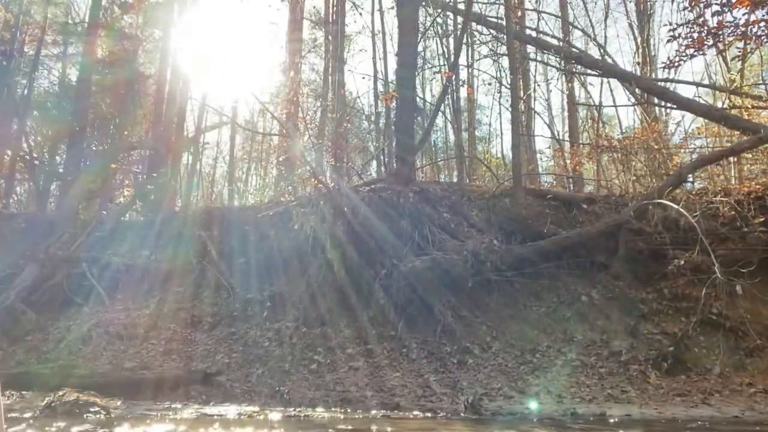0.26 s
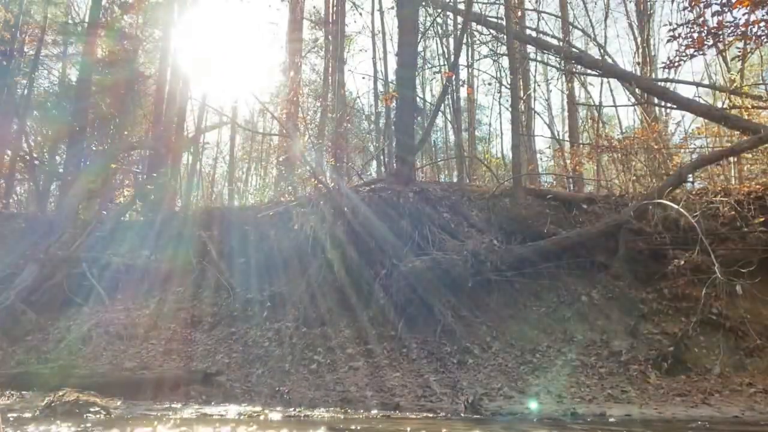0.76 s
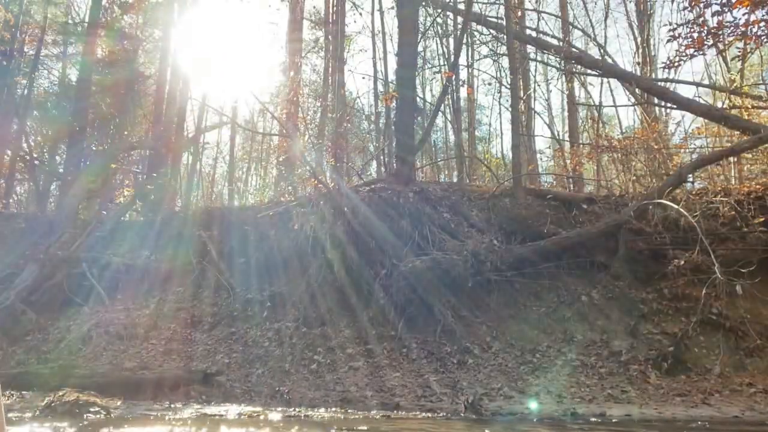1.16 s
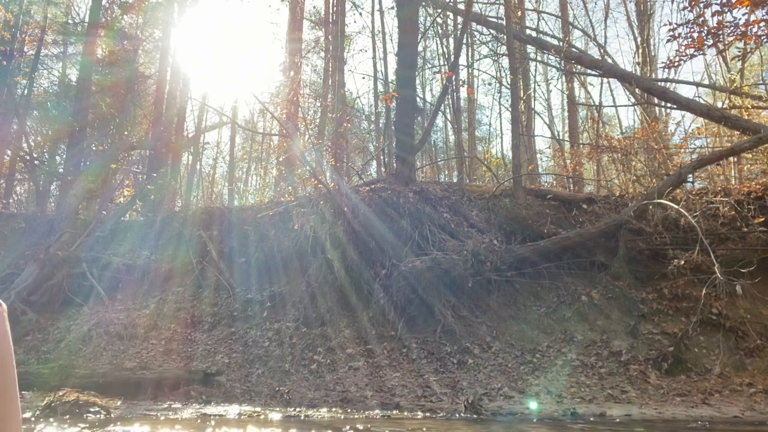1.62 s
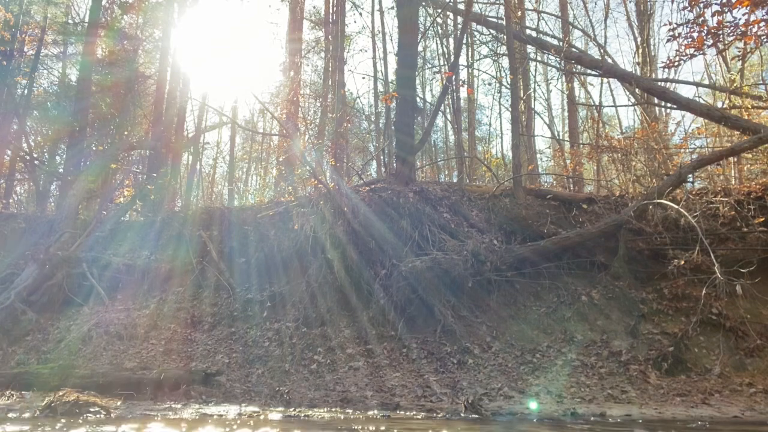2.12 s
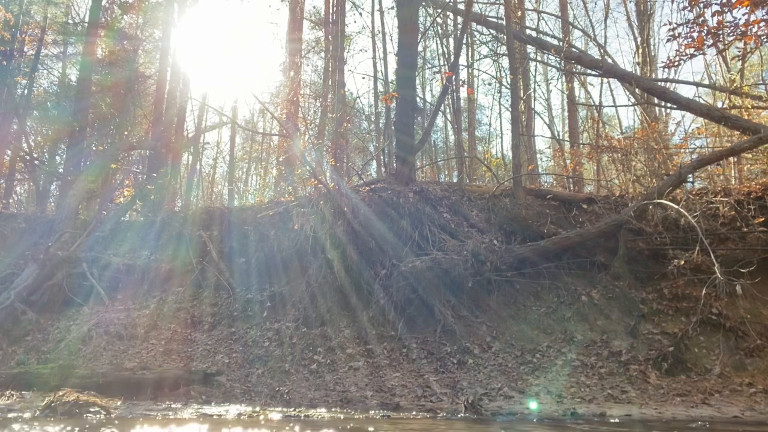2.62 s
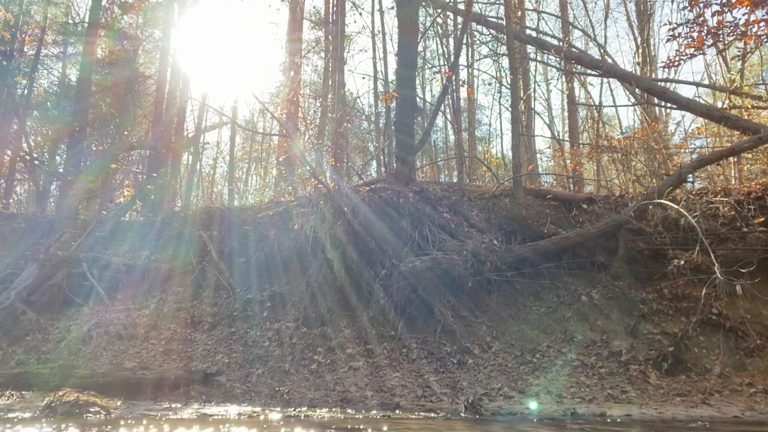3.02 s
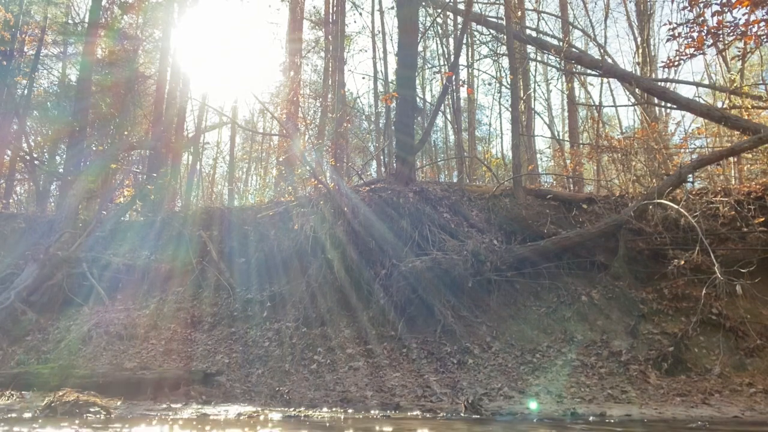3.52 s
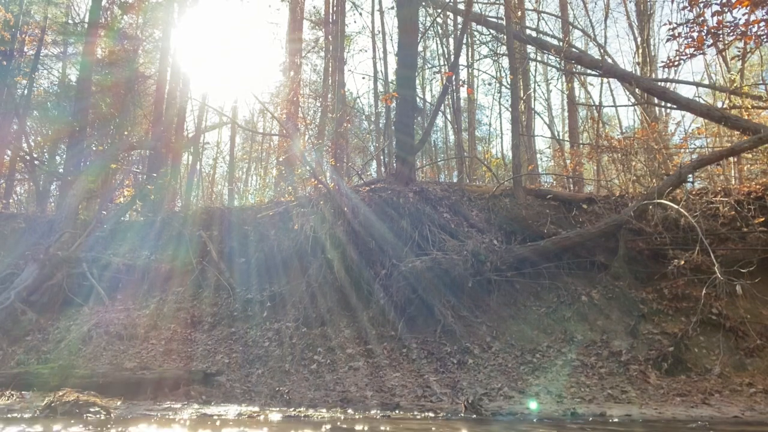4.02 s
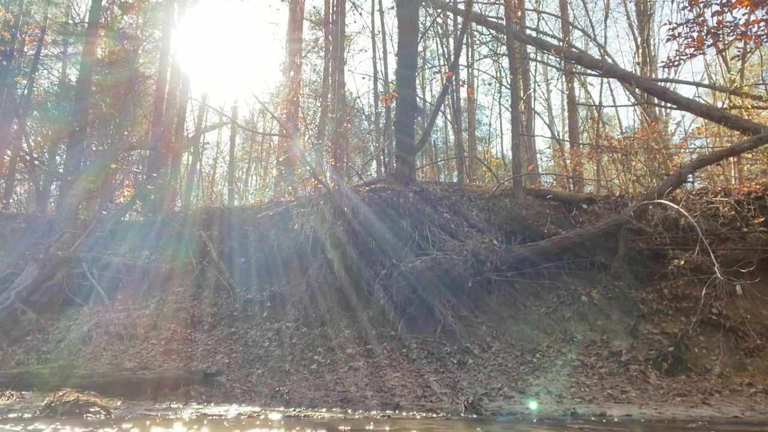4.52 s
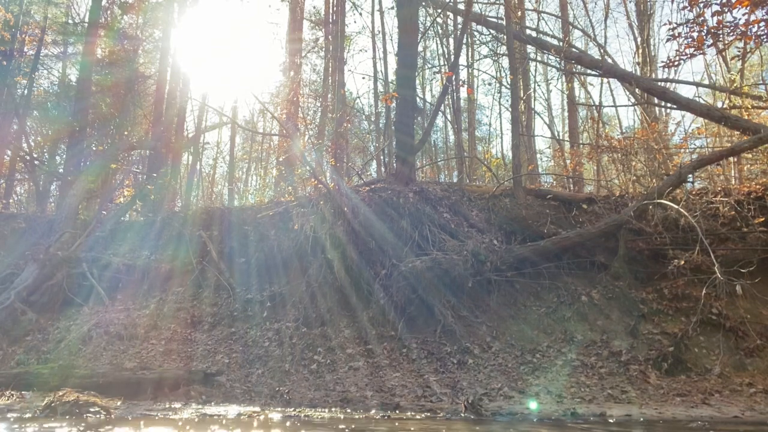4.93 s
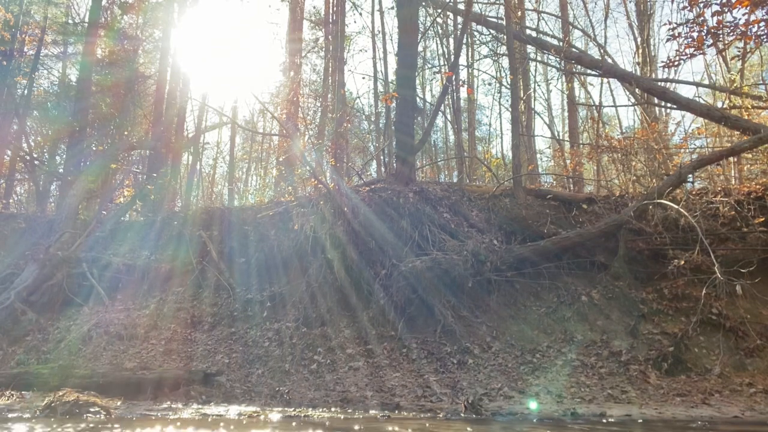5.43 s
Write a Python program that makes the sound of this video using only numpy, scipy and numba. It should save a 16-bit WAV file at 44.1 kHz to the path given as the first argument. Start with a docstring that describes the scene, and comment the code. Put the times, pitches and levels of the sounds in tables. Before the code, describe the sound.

A plastic bucket knocks and dips in a shallow creek, water plinking and sloshing, ending with two loud hollow thuds to the left.

```python
"""Plastic bucket in a shallow creek

A plastic bucket is dragged, knocked and dipped in a creek, left of a small two-microphone recorder.
Knocks crack, ring the wall modes and thud with a hollow pitch that sinks as the bucket fills.
Drops plink as single rising sines; slosh is clouds of such bubbles, with spray made of noisy grains.
Filtered noise makes the creek's trickle and a low rumble that surges after knocks and follows the slosh."""
import sys
import numpy as np
from scipy import signal
from scipy.fft import rfft, irfft, next_fast_len
from scipy.io import wavfile
from numba import njit

SR = 44100
rng = np.random.default_rng(int(sys.argv[2]) if len(sys.argv) > 2 else 0)


def master(y):
    """Save y as 16-bit WAV."""
    cut = np.clip(np.atleast_2d(y).T, -1, 1)
    pcm = np.round(cut * 32767)  # scale
    wavfile.write(sys.argv[1], SR, pcm.astype(np.int16))


N = 249606

# blows on the bucket: t/s, hollow peak level/dB, hollow tone f/Hz, wall ring level/dB re hollow,
# crack level/dB re hollow, strongest wall pitch f/Hz
BUCKET_KNOCKS = [(0.346, -28, 526, -5.5, -1, 870), (0.378, -33, 563, -19, -53, 595),
                 (0.402, -34.5, 560, -6.5, -23, 590), (0.567, -40.5, 450, -4, 1.5, 2330),
                 (0.612, -25.5, 433, -4.5, -5.5, 840), (0.632, -20.5, 410.7, -4, -9, 980),
                 (0.65, -29.5, 381, 3.5, -6, 1720), (0.69, -33.5, 456, -9, -25, 895),
                 (0.707, -32.5, 452, -2, -5, 1340), (0.721, -29.5, 448, 13.5, 5, 990),
                 (0.743, -29.5, 331, -3.5, -8, 840), (1.332, -34, 247, -6.5, -41, 614),
                 (1.683, -44.5, 540, -1.5, -22, 660), (2.506, -40, 488, -5, -6.5, 1000),
                 (2.905, -24, 318, -4, -9, 940), (2.986, -38, 297, -11, -15, 2580),
                 (3.047, -39.5, 328, -30, 16, 1990), (3.422, -37.5, 321, 6.5, -2, 2410),
                 (3.984, -31.5, 311, 3, -9.5, 1035), (4.166, -52.5, 315, 14, -19, 1240),
                 (4.284, -38, 331, 11, -4, 930), (4.294, -33, 271, -15, -22, 867),
                 (4.32, -28.5, 259, -16, -10.5, 860), (4.409, -29.5, 250, -12, -22, 2300),
                 (4.425, -14, 256.7, 7, -8.5, 1250), (4.477, -32.5, 220, -18, -14, 2110),
                 (4.882, -11.5, 214, 7, -6.5, 1790), (4.945, -25.5, 224, -11.5, -20, 780),
                 (4.971, -35, 212, -7, -17, 780), (4.996, -29.5, 267, -5, -22, 900),
                 (5.242, -30, 237, 13.5, -11, 1490), (5.25, -2.5, 244.5, -4.5, -36, 760),
                 (5.263, -22, 243, 3.5, -3, 1780), (5.309, -25.5, 218.5, -7, -14, 623),
                 (5.356, -33.5, 244, -15, -24, 798), (5.428, -34.5, 216, 0, -26, 980),
                 (5.605, 1, 243.3, -1.5, -14.5, 1020)]
# colour of the hard contact noise, also used for drop slaps: f/Hz, level/dB per Hz
CRACK_COLOUR = [(410, -20), (700, -19.5), (881, -6), (1270, -21.5), (1900, -5.5), (2260, -6.5), (2580, -10),
                (3010, -9), (5030, -19.5), (6620, -17.5), (8150, -18), (9610, -37.5), (12500, -107.5),
                (21100, -120)]
LEAD_IN_DB, LEAD_IN_GROWTH_S = -17.5, 0.0042   # level re wall ring, growth time


def bucket():
    """A knock is uneven contact with a short rattle: it cracks, rings the wall at once, the hollow a little later."""
    out = np.zeros(N)
    t = np.arange(SR // 6) / SR
    white = rng.standard_normal(N)
    crackle = colour(white, CRACK_COLOUR)
    grit = signal.sosfilt(signal.butter(2, 450, "high", fs=SR, output="sos"), white)
    for s, db, hollow_hz, wall_db, crack_db, spot_hz in BUCKET_KNOCKS:
        contact = burst(grit, 0.0018, 0.0093, 0.033)
        hollow = hollow_thud(hollow_hz, white, t)
        wall = wall_ring(contact, hollow_hz, spot_hz)
        crack = burst(crackle, 0.0018, 0.028, 0.25)
        add(out, s - .0025, amp(db) * (peak_one(hollow) + amp(crack_db) * crack))
        # faint noise swells before each knock
        growth = np.exp(-t[SR // 50:0:-1] / LEAD_IN_GROWTH_S)
        lead_in = burst(crackle, 0.78, 1, 0)[-SR // 50:] * growth
        add(out, s - 1 / 50, amp(db + wall_db + LEAD_IN_DB) * lead_in)
        add(out, s - .0062, amp(db + wall_db) * peak_one(wall))
    return out


HOLLOW_T60_S = 0.069


def hollow_thud(hz, white, t):
    """The stretched wall starts sharp and sags to rest, roughened by a fast loudness wobble at 0.28 of its pitch."""
    sag = .001 * (1 - np.exp(-t / .005))
    onset = 1 - np.exp(-(t * hz / 2.0) ** 2)
    hollow = np.sin(2 * np.pi * hz * (t + sag)) * onset * amp(-60 * t / HOLLOW_T60_S)
    rough_wobble = np.sin(2 * np.pi * (0.28 * hz * t + 0.55 + 0.32 * rng.random()))
    hollow = hollow * (1 + 0.4 * rough_wobble)
    # the shove moves water too
    water_shove = peak_one(ring(burst(white, 0.004, 0.03, 0.05), 110, 0.03))
    return hollow + 0.13 * (hz / 430) ** 2 * water_shove


# wall modes before the blow's place and the water act on them: f/Hz, level/dB, t60/s
WALL_MODES = [(336.6, 12.5, 0.1), (498.5, 6.5, 0.071), (582, 1, 0.045), (604.4, 2, 0.098),
              (847.2, 7, 0.049), (931, 3, 0.042), (1259, 6, 0.044), (1359.4, 4, 0.077), (1703, -2, 0.066),
              (2155, 6, 0.04), (2246, 1.5, 0.059), (2544, -0.5, 0.077), (2868, -1, 0.05),
              (3558, -0.5, 0.019)]
BEND_LAG_S = 0.0044   # bending waves are slower at low pitch: lag of a 1 kHz mode


def wall_ring(contact, hollow_hz, spot_hz):
    """The contact rings the wall modes; where the blow lands picks the modes."""
    free = (hollow_hz / 430) ** 1.67   # water that lowers the hollow tone also damps the wall
    wall = 0
    for mode_hz, mode_db, mode_t60 in WALL_MODES:
        off_spot = np.log2(mode_hz / spot_hz)   # octaves
        struck_db = mode_db - 5.0 * off_spot ** 2 + 1.5 * rng.standard_normal()
        lag = round(BEND_LAG_S * np.sqrt(1000 / mode_hz) * SR)
        late = np.pad(contact, (lag, 0))[:len(contact)]
        wall = wall + amp(struck_db) * peak_one(ring(late, mode_hz, free * mode_t60))
    return wall


# single drops and bubbles: t/s, peak level/dB, starting pitch f/Hz, slap level/dB re peak
SINGLE_DROPS = [(0.027, -47, 8300, -3.5), (0.064, -46.5, 8000, -10), (0.97, -44, 3020, -11),
                (1.183, -33.5, 915, -47), (1.243, -20, 2040, -15), (1.269, -40, 930, -38),
                (1.293, -35, 1300, -6), (1.309, -37.5, 1890, -14), (1.349, -25, 7780, -14),
                (1.368, -40.5, 2030, -6), (1.37, -45, 964, -17), (1.399, -39.5, 670, -5),
                (1.453, -39.5, 2450, -8), (1.769, -38.5, 1580, -14), (1.797, -25.5, 529, -10.5),
                (1.819, -37.5, 447, -11), (1.835, -30, 610, -17), (1.849, -35.5, 712, -10),
                (1.875, -35, 920, -12), (1.91, -23, 1676, -39), (1.91, -23.5, 648, -8.5),
                (1.909, -28, 1224, -13), (1.912, -26, 2165, -17), (1.93, -34, 581, -18),
                (1.961, -36, 1390, -19), (1.975, -27.5, 976, -31), (1.999, -36.5, 980, 3),
                (1.995, -28, 1640, -19), (2.007, -28, 3060, -16), (2.022, -34.5, 523, -2.5),
                (2.021, -32, 1590, -26), (2.046, -36, 2200, -7), (2.053, -36, 927, -11),
                (2.103, -41.5, 2240, -1), (2.121, -38.5, 2170, -8), (2.226, -45, 7950, 7),
                (2.242, -33, 2660, -6), (2.387, -43.5, 1260, -9), (2.557, -45, 528, -17),
                (2.752, -47, 960, -23), (2.602, -39, 920, 0), (2.588, -35, 2540, -1.5),
                (2.607, -28.5, 3760, 3), (2.617, -14, 8000, -8), (2.629, -28.5, 3846, -19.5),
                (2.66, -41, 518, -7), (2.734, -47.5, 475, 7), (3.048, -25.5, 3550, -55),
                (3.05, -14.5, 6620, -12), (3.163, -42.5, 1320, -4), (3.17, -41, 664, -12),
                (3.187, -33.5, 853, -25), (3.223, -42.5, 887, -35), (3.288, -33.5, 2030, -11.5),
                (3.302, -43, 3020, -52), (3.385, -35.5, 2560, -2.5), (3.469, -37.5, 1130, -2),
                (3.515, -40, 2310, -11), (3.564, -41.5, 2060, -13), (4.219, -38.5, 2420, -5.5),
                (4.273, -39.5, 860, -13), (4.735, -45, 878, -38.5), (5.142, -43.5, 2700, -47)]
DROP_RISE_S = 0.00018   # added to a rise of 1.38 cycles
DROP_CYCLES, CLEAN_CYCLES_PER_DB = 12.5, 2.1   # cycles to die away; the fainter its slap, the longer it rings


def drops():
    """Each drop slaps the surface, then its bubble rings and rises in pitch as it nears the air."""
    out = np.zeros(N)
    t = np.arange(SR // 6) / SR
    crackle = colour(rng.standard_normal(N), CRACK_COLOUR)
    for s, db, hz, slap_db in SINGLE_DROPS:
        life = (DROP_CYCLES - CLEAN_CYCLES_PER_DB * min(slap_db, 0)) / hz
        onset = 1 - np.exp(-(t / (1.38 / hz + DROP_RISE_S)) ** 2)
        bubble = np.sin(2 * np.pi * hz * t * (1 + 0.06 * t / life)) * onset * amp(-60 * t / life)
        add(out, s, amp(db) * peak_one(bubble))
        add(out, s - .002, amp(db + slap_db) * burst(crackle, 0.0015, 0.026, 0.53))
    return out


# slosh over time: t/s, big bubbles level/dB, small bubbles level/dB, spray level/dB
SLOSH_LEVELS = [(0.0, -97, -67, -76), (0.3, -76.5, -76.5, -75), (0.52, -55.5, -73, -66.5),
                (0.75, -60, -72, -78), (1.05, -58, -62.5, -78), (1.4, -49.5, -53.5, -65),
                (1.6, -115, -63.5, -73.5), (1.78, -68, -56, -77), (1.84, -65, -43, -54.5),
                (1.92, -46.5, -41, -56), (1.965, -53.5, -37.5, -60), (1.99, -39, -30.5, -49.5),
                (2.017, -50, -39.5, -63), (2.04, -46.5, -38, -58.5), (2.08, -56.5, -47.5, -59.5),
                (2.2, -51.5, -57.5, -69.5), (2.35, -74, -60, -70.5), (2.49, -60, -58, -66.5),
                (2.75, -59, -60, -73), (2.85, -67, -60.5, -66), (2.95, -70, -74.5, -74.5),
                (3.1, -48.5, -57, -74.5), (3.48, -70, -59, -64), (3.75, -71.5, -70, -80),
                (4.4, -62.5, -64.5, -78), (4.8, -57, -65, -81), (5.66, -49, -66, -75.5)]
# colour of the spray: f/Hz, level/dB per Hz
SPRAY_COLOUR = [(1470, -28.5), (2500, -24), (3430, 4.5), (4420, -28), (5060, -20.5), (5760, -4.5),
                (7600, -12.5), (8100, -8), (8500, -10), (8900, -17), (9610, -56), (12500, -80),
                (21100, -120)]


def slosh():
    """Stirred water releases bubble clouds of two sizes and a fine spray of random grains."""
    big_db, small_db, spray_db = in_time(SLOSH_LEVELS)
    big = amp(big_db) * cloud(193, 1167, 700, 4.6, 3.0, 2.9, 1.86)
    small = amp(small_db) * cloud(800, 4210, 2400, 13.0, 4.5, 4.3, -1.5)
    landed = rng.random(N) < 2500 * amp(4.0 * drift(30)) / SR
    grains = landed * rng.standard_normal(N)
    mist = 0.15 * rng.standard_normal(N)
    spray = amp(spray_db) * colour(rms_one(grains) + mist, SPRAY_COLOUR)
    return big + small + spray


def cloud(low_hz, high_hz, per_s, cycles, spread_db, clump_db, tilt_db):
    """Random bubbles in clumps, pitches spread over the octaves, level tilted in dB per octave upward; rms 1."""
    born = rng.random(N) < per_s * amp(clump_db * drift(15)) / SR
    octaves = np.log2(high_hz / low_hz) * rng.random(N)[born]
    loudness_db = spread_db * np.minimum(rng.exponential(1, N), 4)[born]
    sizes = amp(loudness_db + tilt_db * octaves)
    lives = cycles * amp(rng.normal(0, 5.6, N)[born] + 0.19 * octaves)
    steps = 2 * np.pi * low_hz * 2 ** octaves / SR   # radians a sample
    out = np.zeros(N)
    add_bubbles(out, np.flatnonzero(born), sizes, steps, lives, 0.25)
    return rms_one(out)


@njit
def add_bubbles(out, at, size, step, cycles, rise):
    """Each bubble is a dying sine whose pitch climbs as it nears the surface."""
    for k in range(len(at)):
        life = cycles[k] * 2 * np.pi / step[k]
        for i in range(min(int(life), len(out) - at[k])):
            tone = np.sin(step[k] * i * (1 + rise * i / life))
            out[at[k] + i] += size[k] * tone * np.exp(-6.9 * i / life) * min(1, step[k] * i / 9)


# colour of the trickle: f/Hz, level/dB per Hz
TRICKLE_COLOUR = [(88, -65.5), (150, -23), (299, -2.5), (336, -4.5), (451, -3.5), (632, 6), (1060, 0),
                  (1480, -7.5), (1870, 2), (2300, 0.5), (5000, -32.5), (6500, -69), (11000, -120)]
# trickle over time, before its random wavering: t/s, level/dB
TRICKLE_LEVEL = [(0, -71.5), (.3, -71.5), (.4, -58), (3.0, -59.5), (4.5, -58), (5.66, -57.5)]


def trickle():
    """The creek is smooth coloured noise; each of three ranges of pitch wavers on its own."""
    flow = colour(rng.standard_normal(N), TRICKLE_COLOUR)
    low, mid = (signal.sosfiltfilt(signal.butter(2, hz, fs=SR, output="sos"), flow) for hz in (800, 1700))
    wavering = 0
    for band in (low, mid - low, flow - mid):
        wavering = wavering + band * amp(0.5 * drift(5.3) + 4.35 * drift(19))
    return amp(in_time(TRICKLE_LEVEL)[0]) * wavering


# colour of the rumble: f/Hz, level/dB per Hz
RUMBLE_COLOUR = [(15, -52.5), (35, -22.5), (70, -14.5), (150, -17), (260, -25.5), (600, -95.5)]


def rumble():
    """Low coloured noise whose level surges with knocks and slosh and wanders slowly."""
    small_db = in_time(SLOSH_LEVELS)[1]
    level_db = surge(small_db) + 7.9 * drift(1.5)
    return amp(level_db) * colour(rng.standard_normal(N), RUMBLE_COLOUR)


RUMBLE_DB, RUMBLE_FOLLOWS = -32, 0.74   # surge scale for a 0 dB knock, share of the knock's dB
RUMBLE_RISE_S, RUMBLE_T60_S = 0.0084, 0.7
RUMBLE_REST_DB, RUMBLE_SLOSH_SHARE = -64, 0.81   # level at -60 dB small bubbles, share of their swing


def surge(small_db):
    """Rumble level in dB: powers add as it swells and dies after every knock and follows the small bubbles."""
    blows = np.zeros(N)
    for s, db, *_ in BUCKET_KNOCKS:
        blows[round(s * SR)] = amp(RUMBLE_DB + RUMBLE_FOLLOWS * db) ** 2
    t = np.arange(SR) / SR
    shape = (1 - np.exp(-t / RUMBLE_RISE_S)) * amp(-60 * t / RUMBLE_T60_S)
    knock_power = np.abs(signal.fftconvolve(blows, shape ** 2)[:N])
    slosh_power = amp(RUMBLE_REST_DB + RUMBLE_SLOSH_SHARE * (small_db + 60)) ** 2
    return 10 * np.log10(knock_power + slosh_power)


BANK_DB, BANK_T60_S, BANK_DULL_HZ = -23.5, 0.15, 1410   # level in the left channel, decay, upper band edge


def banks(x):
    """Short dull scatter from banks and trunks, unrelated in the two channels."""
    t = np.arange(SR // 4) / SR
    tail = rng.standard_normal((2, len(t))) * amp(-60 * t / BANK_T60_S) * (t > .004)
    tail = signal.sosfilt(signal.butter(2, [450, BANK_DULL_HZ], "band", fs=SR, output="sos"), tail)
    tail = tail / np.sqrt(np.sum(tail ** 2, axis=1, keepdims=True))
    return signal.fftconvolve(x[None], tail, axes=1)[:, :N]


# body shading of the right microphone above the bass: t/s, level/dB
BODY_SHADE = [(0, 3.5), (.3, -4), (.5, -4.5), (1.0, -8), (2.0, -11.5), (3.0, -10.5), (4.0, -10)]
# right channel against left before the bucket moves: f/Hz, phase/rad
PHASE_BEFORE = [(0, np.pi), (40, 2.5), (180, 2.3), (260, 2.0), (350, 1.2), (700, -3.1), (1200, -4.3),
                (1700, -9.0), (2200, -11.5), (2600, -14.0), (3500, -15.6), (4100, -19.0), (4400, -18.6),
                (5200, -15.7), (7600, -9.4), (12000, 1.0)]
# right channel against left once the bucket has moved: f/Hz, phase/rad, level/dB
PATH_AFTER = [(0, np.pi, -5), (60, 2.4, -5), (300, 2.0, -4), (680, 1.6, -16), (950, -1.1, -16),
              (1300, -1.5, -9), (2400, -4.7, -9), (3900, -6.8, -12), (5200, -3.1, -8), (7600, 3.2, -8),
              (9000, 6.5, -19)]
SHADE_HZ, BASS_SHADE_DB, RIGHT_DULL_HZ = 374, -2.5, 6700   # bass edge, bass level, top roll-off before the move
MOVED_S = 3.9   # the new path is fully in, after a 0.1 s crossfade


def right_channel(x):
    """The far microphone: phase turned by band, duller, body-shaded; the path changes when the bucket moves."""
    size = next_fast_len(N + SR // 10)
    grid = np.arange(size // 2 + 1) * SR / size
    spectrum = rfft(x, size)
    hz, turn = np.transpose(PHASE_BEFORE)
    dulling = np.sqrt(1 + (grid / RIGHT_DULL_HZ) ** 12)
    turned = irfft(spectrum * np.exp(1j * np.interp(grid, hz, turn)) / dulling, size)[:N]
    bass = signal.sosfiltfilt(signal.butter(2, SHADE_HZ, fs=SR, output="sos"), turned)
    before = amp(BASS_SHADE_DB) * bass + amp(in_time(BODY_SHADE)[0]) * (turned - bass)
    hz, turn, db = np.transpose(PATH_AFTER)
    path = np.exp(1j * np.interp(grid, hz, turn)) * amp(np.interp(grid, hz, db))
    after = irfft(spectrum * path, size)[:N]
    share = np.clip(10 * (np.arange(N) / SR - MOVED_S) + 1, 0, 1)
    return before + share * (after - before)


def amp(db):
    """Amplitude factor of a level in dB."""
    return 10 ** (np.asarray(db) / 20)


def rms_one(x):
    """Scales x to rms 1."""
    return x / np.sqrt(np.mean(x ** 2) + 1e-20)


def peak_one(x):
    """Scales x to peak 1."""
    return x / np.max(np.abs(x))


def in_time(rows):
    """Draws each column after t/s as a line over the whole scene."""
    s, *columns = np.transpose(rows)
    return [np.interp(np.arange(N) / SR, s, c) for c in columns]


def colour(x, spectrum):
    """Filters x by a curve of f/Hz, level/dB; rms 1."""
    hz, db = np.transpose(spectrum)
    size = next_fast_len(N)
    grid = np.log(np.arange(1, size // 2 + 2) * SR / size)
    return rms_one(irfft(rfft(x, size) * amp(np.interp(grid, np.log(hz), db)), size)[:N])


def drift(rate):
    """Slow random wander of spread 1, smoothed above a rate in Hz."""
    r = np.exp(-80 * np.pi * rate / SR)   # one step is 40 samples
    slow = signal.lfilter([1], [1, -2 * r, r * r], rng.standard_normal(N // 40 + 2002))[2000:]
    return np.interp(np.arange(N) / 40, np.arange(len(slow)), rms_one(slow))


def ring(clicks, hz, t60):
    """A resonator: a unit click sets a dying sine of height 1 ringing."""
    r, w = amp(-60 / (t60 * SR)), 2 * np.pi * hz / SR
    return signal.lfilter([0, np.sin(w)], [1, -2 * r * np.cos(w), r * r], clicks + 1e-18)


def burst(noise, rise_s, tail_s, tail):
    """A random stretch of noise under a quick swell with a longer, uneven tail; peak 1."""
    t = np.arange(SR // 6) / SR
    start = rng.integers(0, N - len(t))
    uneven = amp(np.repeat(rng.normal(0, 0.98, len(t) // 100 + 1), 100)[:len(t)])
    rattle = tail * uneven * np.exp(-t / tail_s) * (1 - np.exp(-t / rise_s))
    return peak_one(noise[start:start + len(t)] * (swell(rise_s, t) + rattle))


def swell(rise_s, t):
    """Grows smoothly to 1 at twice the rise time, then dies."""
    return (t / rise_s / 2) ** 2 * np.exp(2 - np.minimum(t / rise_s, 60))


def add(out, s, sound):
    """Mixes a sound in at s seconds."""
    at = round(s * SR)
    out[at:at + len(sound)] += sound[:N - at]


def scene():
    """Mixes all sources on the left, derives the right from them and adds the scatter, 5 dB weaker on the right."""
    near = bucket() + drops() + slosh() + trickle() + rumble()
    scatter = amp(BANK_DB) * banks(near) * amp([[0], [-5]])
    return np.array([near, right_channel(near)]) + scatter


HISS_DB, CUTOFF_HZ = -82.5, 12800   # hiss rms before the final cut, edge of that cut


def record(dry):
    """The microphones lose deep bass and top; peaks are rounded, a faint hiss is added, the top is cut."""
    thinned = signal.sosfilt(signal.butter(3, 38, "high", fs=SR, output="sos"), dry)
    rounded = thinned / (1 + (thinned / .95) ** 6) ** (1 / 6)
    dulled = signal.sosfilt(signal.butter(7, 9300, fs=SR, output="sos"), rounded)
    # the sound port resonates
    ported = dulled + 0.5 * signal.lfilter(*signal.iirpeak(8150, 14, fs=SR), dulled)
    hiss = amp(HISS_DB) * rng.standard_normal(dry.shape)
    return signal.sosfilt(signal.cheby2(12, 70, CUTOFF_HZ, fs=SR, output="sos"), ported + hiss)


dry = scene()
out = record(dry)
master(out)
```